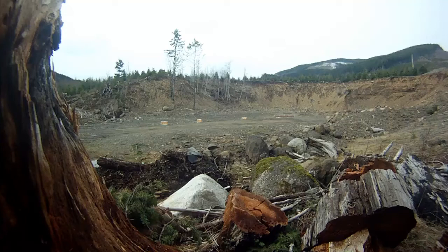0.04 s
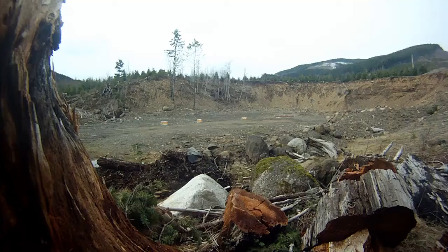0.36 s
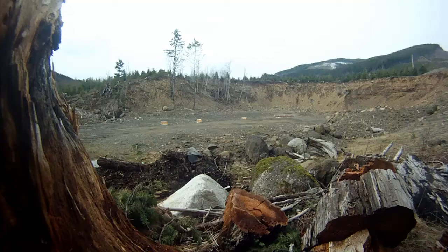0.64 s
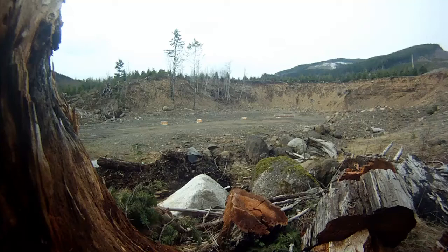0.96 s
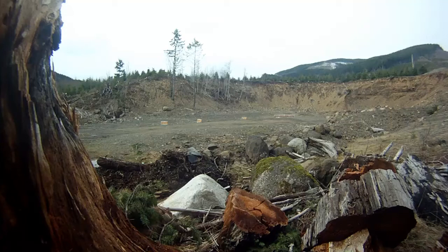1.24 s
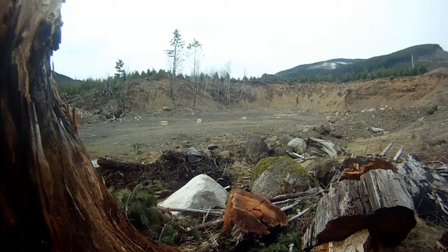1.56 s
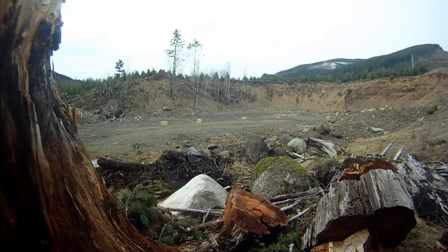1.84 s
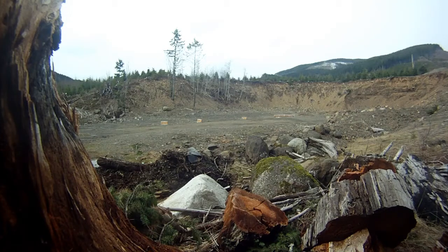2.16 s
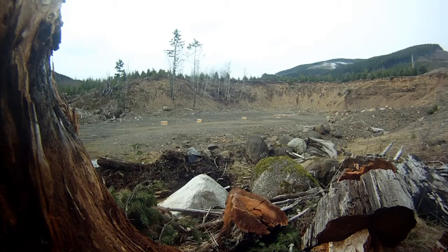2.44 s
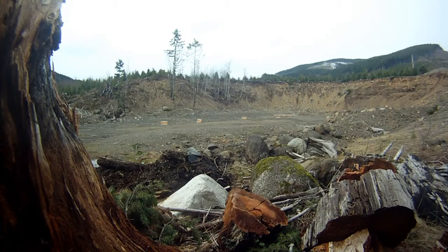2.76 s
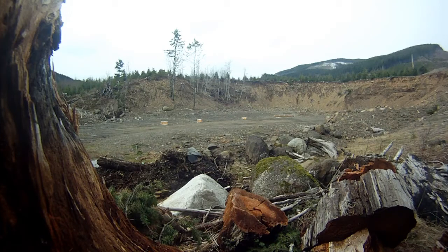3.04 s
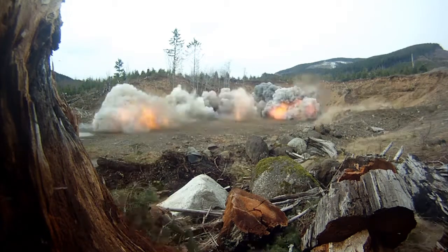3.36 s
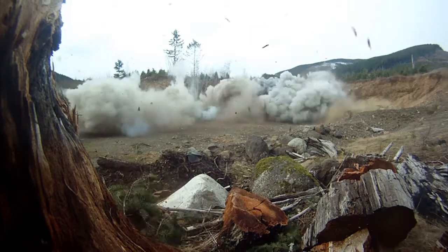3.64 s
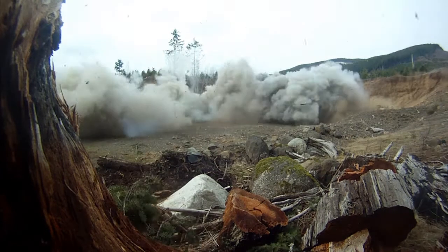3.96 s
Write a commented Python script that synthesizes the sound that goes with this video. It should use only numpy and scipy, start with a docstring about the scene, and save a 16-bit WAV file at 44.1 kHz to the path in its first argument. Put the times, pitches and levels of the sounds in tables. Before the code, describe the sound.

Explosive charges go off some way away in a quiet gravel pit. After near silence, low ground thumps lead into sharp, tightly packed blasts that overload the microphone, followed by a crackling echo and a deep rumble.

```python
"""A row of explosive charges goes off in a quiet gravel pit, some way from a camera.
The shock through the ground thumps first; then six shocks through the air rattle the camera's
housing and overload its microphone. The pit walls throw them back as a crackling roar that rings
the same housing, over a growing rumble and a faint outdoor hush."""
import sys
import numpy as np
from scipy import signal
from scipy.fft import rfft, irfft
from scipy.io import wavfile
from scipy.ndimage import uniform_filter1d

SR = 44100
rng = np.random.default_rng(int(sys.argv[2]) if len(sys.argv) > 2 else 0)


def unload_wav(signal):
    """Save mono or channel-first audio to the path in sys.argv[1] as 16-bit WAV at rate SR, clipped to [-1, 1]."""
    wavfile.write(
        sys.argv[1],
        SR,
        np.round(np.clip(np.atleast_2d(signal).T, -1, 1) * 32767).astype(np.int16),
    )


N = 176400

# How strong each pitch is in an air shock: pitch_hz, level_db
SHOCK_TONE = [(100, -17.5), (420, -4.5), (570, -11), (790, -8.5), (930, -5), (1200, -8.5), (1500, -6),
              (2100, 2.5), (2900, -6), (3600, -6), (4400, -16.5), (5200, -10.5), (7500, -18.5),
              (9600, -8.5), (12000, -24.5), (14300, -11.5), (16000, -31)]
# Pitches that the camera's housing boosts or swallows: pitch_hz, width_hz, boost_db
HOUSING_RESONANCES = [(470, 196, 4.5), (628, 71, 9), (798, 41, 6), (1175, 240, 11.5), (1297, 138, -9.5),
                      (1527, 83, 6.5), (1648, 70, -8.5), (1824, 130, 6.5), (2164, 210, 4.5),
                      (2480, 150, 8.5), (2736, 70, 5.5), (2920, 57, -9), (3200, 84, 7), (3593, 113, 5)]


def gain(db):
    """Turn decibels into a number to multiply by."""
    return 10 ** (np.asarray(db) / 20)


def normalise(x):
    """Scale a signal to an average (rms) level of 1."""
    return x / np.sqrt(np.mean(x ** 2))


def seconds_since(start_s):
    """A clock that stays at 0 until start_s."""
    return np.maximum(np.arange(N) / SR - start_s, 0)


def loudness_curve(rows):
    """Join (time_s, level_db) points into a changing gain, silent before the first."""
    time_s, level_db = np.array(rows).T
    return gain(np.interp(np.arange(N) / SR, time_s, level_db, left=-200))


def shape_tone(x, tone, resonances=()):
    """Filter x by (pitch_hz, level_db) points and resonances; white noise keeps its power."""
    size = 8192
    hz = np.arange(size // 2 + 1) * SR / size
    pitch_hz, level_db = np.array(tone).T
    shape_db = np.interp(np.log(hz + 1), np.log(pitch_hz), level_db)
    for centre_hz, width_hz, boost_db in resonances:
        shape_db += boost_db / (1 + (2 * (hz - centre_hz) / width_hz) ** 2)
    # Make the filter ring only after a sound, never before it (minimum phase).
    cepstrum = irfft(np.log(gain(shape_db)))
    cepstrum[1:size // 2] *= 2
    cepstrum[size // 2 + 1:] = 0
    ring = irfft(np.exp(rfft(cepstrum)))
    return signal.fftconvolve(x, ring / np.sqrt(np.sum(ring ** 2)))[:N]


def wander(rate_hz):
    """A smooth random drift with a typical size of 1."""
    span = int(SR / rate_hz)
    return normalise(uniform_filter1d(uniform_filter1d(rng.standard_normal(N), span), span))


def outdoor_hush():
    """Distant air and forest make a faint, nearly even hush."""
    # How strong each pitch is in the hush: pitch_hz, level_db
    hush_tone = [(12, -44), (20, -8), (64, -0.5), (288, -6), (414, -9.5), (462, -9.5), (4150, -21),
                 (5190, -23), (5960, -26.5), (7650, -25), (11900, -31.5), (15300, -30)]
    hush = normalise(shape_tone(rng.standard_normal(N), hush_tone))
    level_db = -63 + 0.82 * wander(rate_hz=6.8)
    return hush * gain(level_db)


def hill_rumble():
    """The deep part of the blasts rolls back late from the hills."""
    # How strong each pitch is in the rumble: pitch_hz, level_db
    rumble_tone = [(10, -28), (20, -10), (31, 0), (48, -3.5), (70, -8), (120, -13.5), (200, -16.5),
                   (500, -69.5)]
    # How the rumble swells and dips: time_s, level_db
    rumble_levels = [(3.31, -33), (3.42, -23), (3.50, -34), (3.55, -25), (3.6, -36.5), (3.66, -22),
                     (3.73, -30.5), (3.83, -24), (3.88, -22.5), (4.0, -18)]
    return normalise(shape_tone(rng.standard_normal(N), rumble_tone)) * loudness_curve(rumble_levels)


def ground_thumps():
    """Each shock through the ground shakes the camera: a swing that fades and drops in pitch."""
    # Ground shocks: start_s, level_db, starting_pitch_hz, decay_s
    thumps = [(3.233, -33, 60.7, 0.013), (3.281, -30.5, 104, 0.031), (3.302, -29, 40, 0.0082)]
    half_pitch_s = 0.036
    shaking = np.zeros(N)
    for start_s, level_db, pitch_hz, decay_s in thumps:
        age = seconds_since(start_s)
        cycles = pitch_hz * half_pitch_s * np.log1p(age / half_pitch_s)
        shaking -= gain(level_db) * np.sin(2 * np.pi * cycles) * np.exp(-age / decay_s)
    return shaking


def crackle():
    """Many tiny echoes of uneven size crackle over a smooth wash of noise."""
    echoes_per_s, scatter_db, wash_db, flutter_db = 1800, 2.5, -2, 0.77
    arrivals = rng.random(N) < echoes_per_s / SR
    signs = rng.choice([-1, 1], N)
    sizes = gain(scatter_db * np.minimum(rng.exponential(size=N), 4))
    echoes = normalise(arrivals * signs * sizes)
    wash = gain(wash_db) * rng.standard_normal(N)
    return normalise(echoes + wash) * gain(flutter_db * wander(rate_hz=98))


def far_wall_slaps():
    """The far wall sends the shocks back, smeared but still bright."""
    # Echoes off the far wall: start_s, level_db, decay_s
    slaps = [(3.57, -15, 0.009), (3.591, -20, 0.0091), (3.623, -22.5, 0.027)]
    rise_s = 0.003
    strength = np.zeros(N)
    for start_s, level_db, decay_s in slaps:
        age = seconds_since(start_s)
        strength += gain(level_db) * np.minimum(age / rise_s, 1) * np.exp(-age / decay_s)
    return shape_tone(crackle() * strength, SHOCK_TONE, HOUSING_RESONANCES)


def echo_roar():
    """Countless echoes from rock faces and trees make the housing ring."""
    # How strongly the pit walls echo: time_s, level_db
    echo_levels = [(3.31, -27), (3.35, -22), (3.39, -28), (3.43, -23), (3.46, -25), (3.51, -21.5),
                   (3.545, -20.5), (3.585, -17.5), (3.64, -19.5), (3.685, -24.5), (3.755, -24.5),
                   (3.805, -21), (3.83, -22), (3.92, -20), (4.0, -20.5)]
    # How strong each pitch is in the roar: pitch_hz, level_db
    roar_tone = [(60, -0.5), (130, -13), (260, -2.5), (370, -11), (700, -16.5), (1000, -7), (1380, -8),
                 (2000, -4.5), (2600, -11.5), (2900, -13.5), (3500, -14), (4300, -23), (5200, -26),
                 (6000, -29), (7500, -26.5), (10000, -14), (11000, -21), (11900, -32), (13000, -23.5),
                 (14100, -16), (15400, -26)]
    return shape_tone(crackle() * loudness_curve(echo_levels), roar_tone, HOUSING_RESONANCES)


def air_shocks():
    """Each blast is an N-shaped pressure wave; as it passes, the housing rattles and the body knocks."""
    # Shocks reaching the camera: start_s, rattle_db, length_s, rise_s, wave_db, knock_vs_rattle_db
    shocks = [(3.3057, 3.5, 0.0074, 0.003, -3, -1.5), (3.3161, -16.5, 0.0048, 0.00063, -15, -12),
              (3.3238, -6, 0.0067, 0.0042, -6, -17), (3.3537, -7.5, 0.004, 0.00059, -15.5, -17),
              (3.3656, -11, 0.0069, 0.00085, -15.5, -18), (3.414, -6.5, 0.0025, 0.00014, -11, -17)]
    # The hollow knock of the camera's body: pitch_hz, level_db
    knock_tone = [(200, -18.5), (430, -2), (560, -8.5), (780, -2), (930, -8), (1170, -5), (1600, -19.5),
                  (4000, -50)]
    rattle_decay_s, wave_decay_s, wave_cutoff_hz = 0.0013, 0.00083, 590
    rattle_strength, knock_strength, wave = np.zeros((3, N))
    for start_s, rattle_db, length_s, rise_s, wave_db, knock_vs_rattle_db in shocks:
        age = seconds_since(start_s)
        since_end = np.maximum(age - length_s, 0)
        shake = gain(rattle_db) * np.minimum(age / rise_s, 1) * np.exp(-since_end / rattle_decay_s)
        rattle_strength += shake
        knock_strength += shake * gain(knock_vs_rattle_db)
        ramp = (age > 0) * np.minimum(2 * age / length_s - 1, 1)  # jumps to -1, then climbs to +1
        wave += gain(wave_db) * ramp * np.exp(-since_end / wave_decay_s)
    wave = signal.sosfilt(signal.butter(2, wave_cutoff_hz, fs=SR, output="sos"), wave)
    rattle = rattle_strength * shape_tone(rng.standard_normal(N), SHOCK_TONE, HOUSING_RESONANCES)
    knock = knock_strength * shape_tone(rng.standard_normal(N), knock_tone, HOUSING_RESONANCES)
    return wave + rattle + knock


def scene():
    """All the sounds add up at one microphone."""
    mix = outdoor_hush() + ground_thumps() + air_shocks() + echo_roar() + far_wall_slaps() + hill_rumble()
    return mix[None]


def record(dry):
    """The microphone comes on after a moment, flattens the loudest peaks and trims the treble."""
    # Narrow bands that the microphone weakens: pitch_hz, width_hz
    notches = [(6000, 1050), (12000, 2070)]
    start_s, fade_in_s = 0.092, 0.0046
    notch_depth, cutoff_hz = 0.77, 15400
    x = dry * np.minimum(seconds_since(start_s) / fade_in_s, 1)
    x = x / (1 + x ** 6) ** (1 / 6)  # overload: peaks are squashed to stay under 1
    for pitch_hz, width_hz in notches:
        band = signal.lfilter(*signal.iirpeak(pitch_hz, pitch_hz / width_hz, fs=SR), x)
        x = x - notch_depth * band
    return signal.sosfilt(signal.ellip(10, .2, 70, cutoff_hz, fs=SR, output="sos"), x)


dry = scene()
out = record(dry)
unload_wav(out)
```